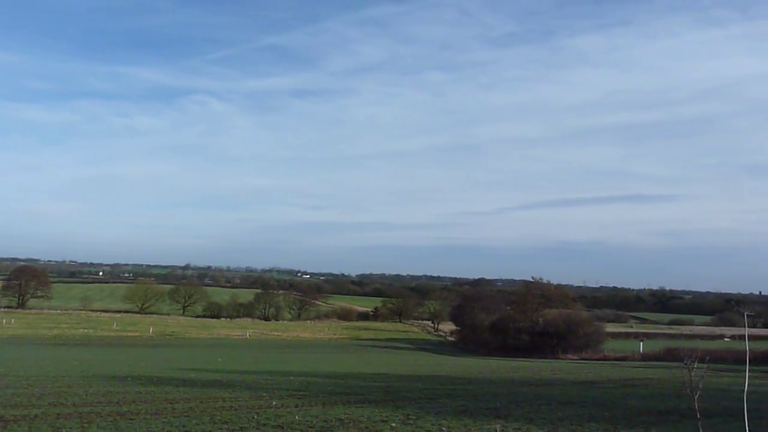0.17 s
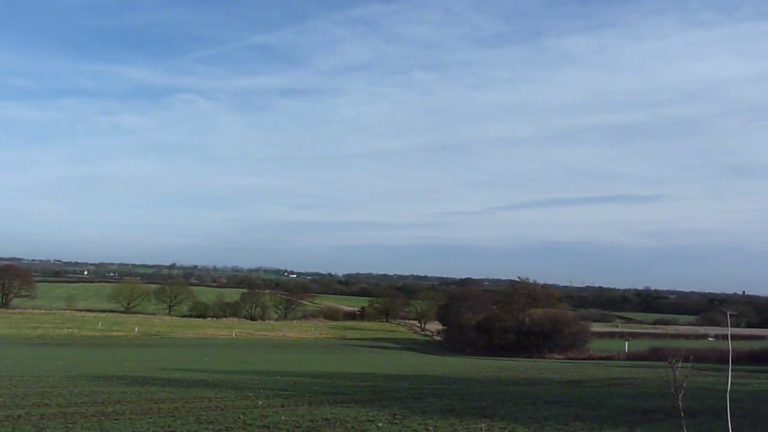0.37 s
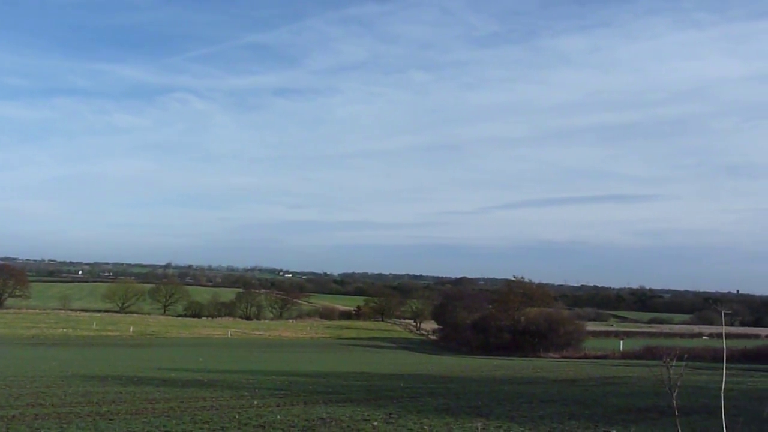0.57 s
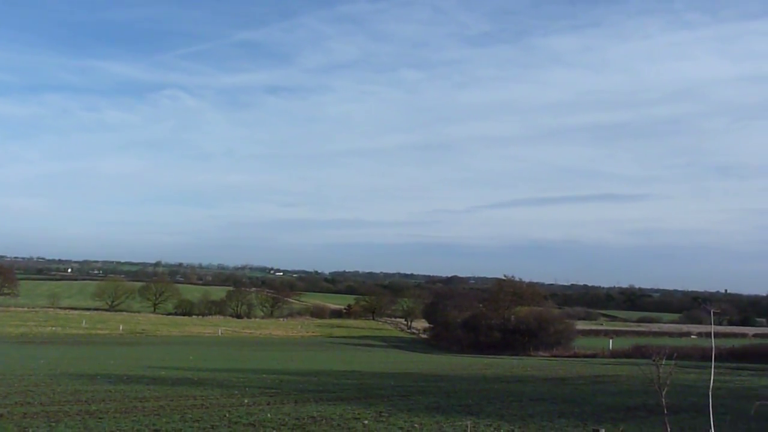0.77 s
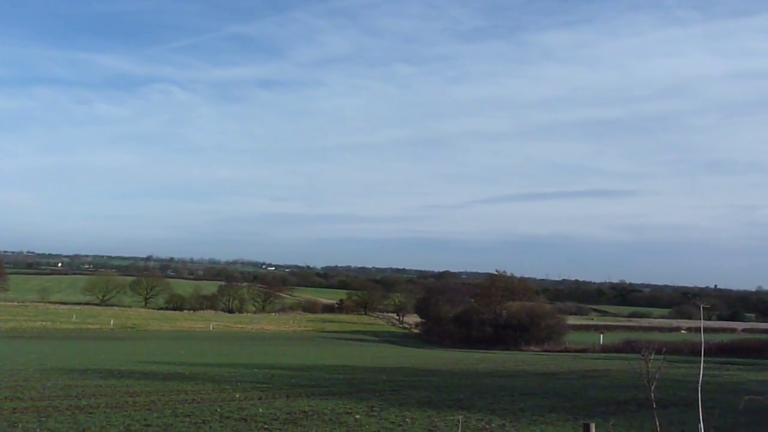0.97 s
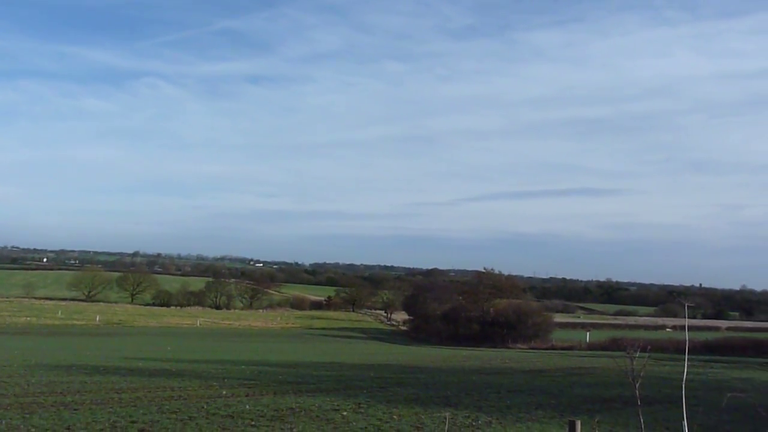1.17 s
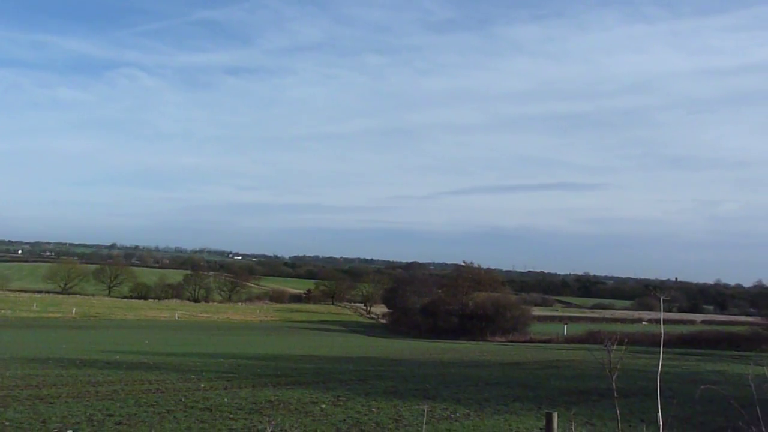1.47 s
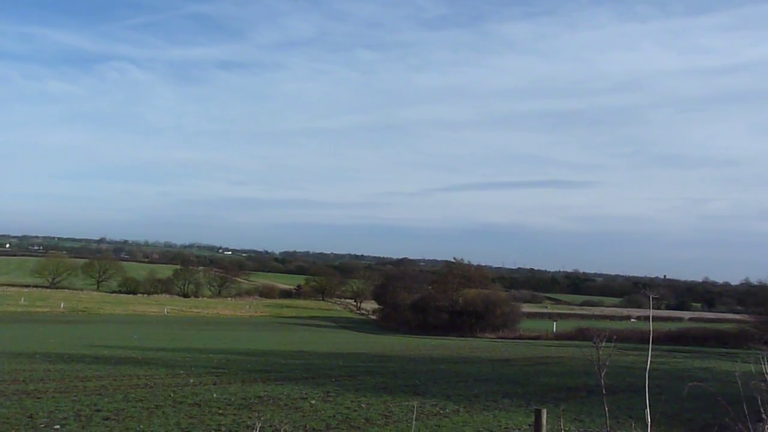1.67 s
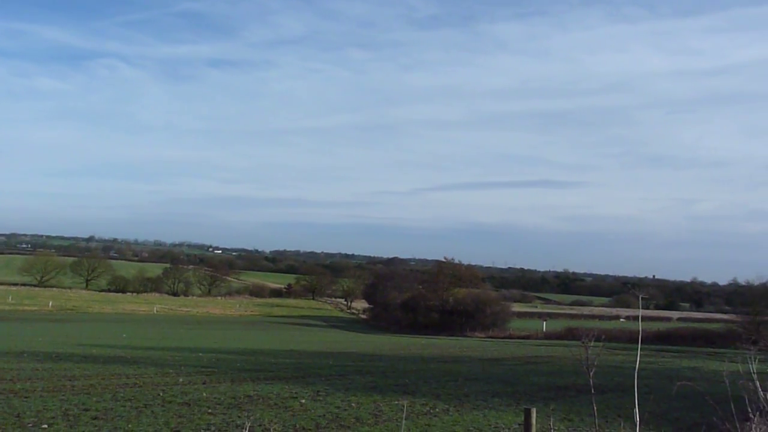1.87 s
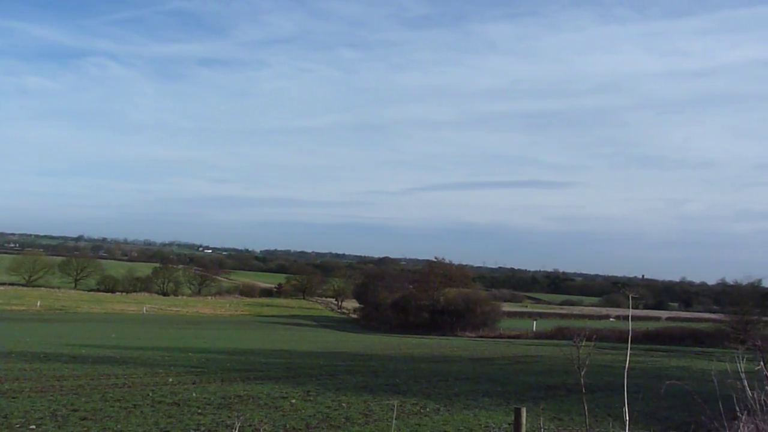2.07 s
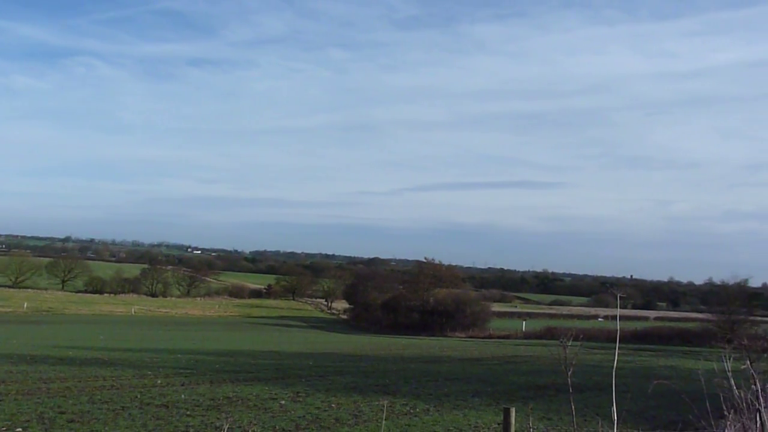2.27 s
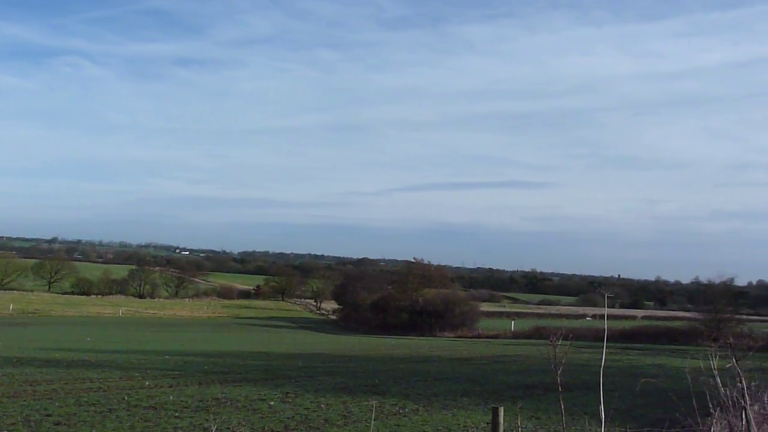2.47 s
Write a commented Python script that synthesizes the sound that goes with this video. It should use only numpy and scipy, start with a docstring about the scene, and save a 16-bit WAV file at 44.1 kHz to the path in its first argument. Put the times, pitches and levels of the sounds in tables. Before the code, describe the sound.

Birdsong across open farmland, busy at first then sparse, with low far-road roar and late wind thumps

```python
"""Farmland birds over far traffic

Small birds whistle and slur as bending sines; the ground adds single echoes and hedges a diffuse noise tail. A
nearer bird on the right gives a rising harmonic "chwee" with a scratchy onset, then two trilled rasps. Shaped
noise and an engine tone make far traffic; low noise makes two light gusts on the microphone, the last with soft
thumps of short sines. The camera adds hiss, a thin whine, a brief rustle, narrow notches and a treble limit."""
import sys
import numpy as np
from scipy import signal
from scipy.fft import rfft, irfft, next_fast_len
from scipy.io import wavfile
from scipy.ndimage import map_coordinates

SR = 44100
rng = np.random.default_rng(int(sys.argv[2]) if len(sys.argv) > 2 else 0)


def materialize(psi):
    """Save the field psi as 16-bit PCM at rate SR to the path in sys.argv[1].

    A 1-D psi becomes a single channel; in a 2-D psi each row is a channel.
    """
    bounded = np.clip(np.atleast_2d(psi).T, -1, 1)
    quanta = np.round(bounded * 32767).astype(np.int16)
    wavfile.write(sys.argv[1], SR, quanta)


N = 115101  # length in samples

# Colours are relative: each noise is scaled to rms 1 before its level. Positive pan is left.
# low traffic rumble colour: pitch_hz, level_db
RUMBLE_COLOUR = [(10, -20), (25, -11), (40, -6), (52, -.5), (95, -1), (160, -8.5), (260, -20), (450, -34),
                 (2000, -60)]
# traffic roar colour: pitch_hz, level_db
ROAR_COLOUR = [(120, -14), (210, -4.5), (290, 1), (370, -1), (530, -6), (720, -4), (950, -7), (1300, -16),
               (2000, -25), (3000, -46), (9000, -54)]
# likeness of left and right in the traffic: pitch_hz, correlation (1 = identical)
TRAFFIC_LIKENESS = [(200, .985), (500, 1), (1000, .92), (2000, .75)]
# tyre noise colour: pitch_hz, level_db
TYRE_COLOUR = [(300, -42), (750, 1), (1050, 1.5), (1400, -10), (2500, -32.5), (6000, -54.5)]
# swell of tyre noise: time_s, level_db
TYRE_SWELL = [(0, -73), (.55, -66), (1.1, -57.5), (1.5, -70), (2.6, -82)]
# far engine drone: time_s, level_db
DRONE_SWELL = [(0, -53), (.7, -52), (1.2, -50.5), (1.6, -57), (2.1, -54), (2.6, -50)]
RUMBLE_DB, ROAR_DB = -48.5, -48.5
DRONE_HZ, DRONE_WANDER_HZ = 81.5, 6
TRAFFIC_LEAD_S, TRAFFIC_PAN_DB = .00006, 0.6

# camera hiss colour: pitch_hz, level_db
HISS_COLOUR = [(100, -6), (1800, 5.5), (3600, 3), (6200, 4), (7200, 2), (7700, -4), (8500, -18.5),
               (9000, -24)]
# camera whine partials: pitch_hz, level_db
WHINE_PARTIALS = [(500, -65), (1000, -75.5)]
HISS_DB, HISS_PAN_DB = -64.5, -1

# whistled notes: start_s, length_s, start_hz, middle_hz, end_hz, level_db, pan_db
WHISTLED_NOTES = [ (-.015, 0.072, 7900, 7550, 7200, -65, -11), (0.044, 0.024, 7300, 6970, 6400, -66, -12),
                  (0.047, 0.097, 3400, 3190, 3230, -59, 1), (0.136, 0.055, 7540, 7350, 6750, -66, -9),
                  (.178, .025, 7000, 6600, 5700, -59, -11.5), (0.201, 0.0526, 3934, 3882, 3870, -55, 2),
                  (.246, .052, 3994, 3995, 3890, -63, 0), (0.248, .028, 7060, 6820, 6830, -64.5, -8),
                  (0.29, .022, 3950, 3780, 3150, -61, 5), (.33, .027, 6100, 5750, 5430, -55.5, -10.5),
                  (.353, .018, 5450, 5130, 4750, -51.5, -12), (.303, .026, 3350, 2780, 2680, -66, 2),
                  (.335, .11, 2700, 2840, 2790, -71, 2), (.444, .034, 6300, 6600, 6540, -65, -13),
                  (0.479, 0.017, 6130, 6120, 6260, -62, 7), (0.543, .012, 5300, 5050, 4800, -53, -10),
                  (0.736, 0.03, 5720, 5620, 5500, -63.5, -16), (0.76, 0.023, 5490, 5220, 4800, -62, -16),
                  (0.787, 0.048, 4320, 4130, 3730, -70, 6), (1.609, 0.06, 5180, 5340, 5250, -69.5, 9),
                  (1.805, 0.039, 4350, 3980, 3530, -68, 6), (2.125, 0.034, 5320, 5200, 5020, -72, 4.5),
                  (2.371, 0.042, 5400, 5200, 4950, -68, 12)]
NOTE_ATTACK_S, NOTE_RELEASE_S = 0.012, .007
WAVER_FRACTION, FLUTTER_DB = .006, 2.2  # random pitch and level movement
LEAD_S_PER_DB = .000005  # the louder side also hears a bird first

# single echoes off the ground: delay_s, level_db
GROUND_ECHOES = [(.02, -16), (.036, -19)]
HEDGE_DB, HEDGE_T60_S, HEDGE_BUILDUP_S = -8.5, .5, .008

# Near-bird levels are set ahead of its flutter, which also lowers them on average.
# rising call: time_s, pitch_hz, level_db (ahead of the throat)
RISING_CALL = [(0.497, 2100, -65), (.506, 2370, -55), (.514, 2650, -56), (0.5215, 3000, -48),
               (.524, 3220, -49), (0.533, 3270, -49), (.537, 3500, -55), (.546, 4170, -46),
               (0.554, 4450, -60), (.562, 4370, -49), (0.57, 4320, -45), (.58, 4380, -62),
               (.665, 4390, -71)]
# throat resonance, as gain on each harmonic: pitch_hz, gain_db
THROAT_GAIN = [(2300, -8), (3200, -5.5), (4300, 2), (5200, 0), (6400, .5), (7300, -8), (8200, -36),
               (12000, -52)]
# quick upward sweeps of a second voice at the onset: start_s, length_s, start_hz, end_hz, level_db
ONSET_SWEEPS = [(0.503, 0.011, 3200, 3800, -56), (0.509, 0.012, 3100, 3600, -54)]
# short rasps: start_s, length_s, centre_hz, level_db
SHORT_RASPS = [(0.495, .027, 6400, -53), (.518, .025, 6200, -55), (.54, .05, 6000, -66),
               (0.707, 0.028, 4750, -55.5), (1.28, 0.036, 4790, -62)]
CALL_ROUGH_FRACTION, SWEEP_ROUGH_FRACTION = .008, .03  # random pitch jitter
CALL_EDGE_S, RASP_RELEASE_S = .003, .008
RASP_JITTER_HZ, TRILL_HZ, TRILL_SWING_HZ = 340, 112, 550
CALL_FLUTTER_DB, RIGHT_BIRD_PAN_DB = 2.2, -14.5

# wind buffeting colour: pitch_hz, level_db
WIND_COLOUR = [(10, -20), (35, -5), (85, 1.5), (150, -5), (300, -14), (480, -22), (2000, -68.5)]
# the gusts: time_s, level_db
WIND_GUSTS = [(0, -68), (1.2, -69), (1.4, -51), (1.7, -62), (2.1, -69), (2.32, -56), (2.41, -42),
              (2.5, -42), (2.61, -49)]

# hand rustle colour: pitch_hz, level_db
RUSTLE_COLOUR = [(1000, -20), (2600, 1), (4000, 4), (6200, 4), (9000, -26)]
RUSTLE_S, RUSTLE_WIDTH_S, RUSTLE_DB, RUSTLE_PAN_DB = 2.207, .009, -57, -2.5

# soft low thumps of wind on the microphone in the last gust: start_s, length_s, pitch_hz, level_db, pan_db
WIND_THUMPS = [(2.414, .032, 88, -37.5, 1.5), (2.477, .02, 95, -36, -6), (2.489, .026, 300, -40.5, 0)]

# narrow camera notches: centre_hz, half_width_hz
CAMERA_NOTCHES = [(2600, 304), (4600, 294), (5430, 140), (7880, 150)]
TOP_HZ = 8750


def amp(db):
    """Decibels to linear gain."""
    return 10 ** (np.asarray(db) / 20)


def unit(x):
    """Scale to rms 1."""
    return x / np.sqrt(np.mean(x ** 2) + 1e-20)


def clock():
    """Time of every sample in seconds."""
    return np.arange(N) / SR


def along(points, hz):
    """Read (pitch_hz, value) points on a log pitch axis."""
    point_hz, value = np.transpose(points)
    return np.interp(np.log(hz + 1), np.log(point_hz + 1), value)


def curves(rows):
    """One value per sample for each column after the time."""
    time, *columns = np.transpose(rows)
    return [np.interp(clock(), time, column) for column in columns]


def wobble(rate):
    """A smooth random curve with rate knots a second."""
    knots = rng.standard_normal(int(N * rate / SR) + 4)
    return map_coordinates(knots, [clock() * rate])


def filtered(x, response):
    """Shape x by a response of frequency."""
    m = next_fast_len(N + SR // 2)
    spectrum = rfft(x, m) * response(np.fft.rfftfreq(m, 1 / SR))
    return irfft(spectrum, m)[..., :N]


def panned(x, pan_db):
    """Make the left louder than the right by pan_db, keeping the mean power gain at 1."""
    gains = amp(np.array([[pan_db], [-pan_db]]) / 2)
    return x * unit(gains)


def ahead(x, lead_s):
    """The left side arrives lead_s earlier than the right."""
    sides = np.array([[1], [-1]])
    return filtered(x, lambda f: np.exp(1j * np.pi * f * lead_s * sides))


def rush(colour, alike=((100, 0), (1000, 0))):
    """Stereo noise of rms 1; mid and side shares set its left-right likeness."""
    def mid_side_gains(hz):
        turn = np.arccos(np.clip(along(alike, hz), -1, 1)) / 2
        return amp(along(colour, hz)) * [np.cos(turn), np.sin(turn)]
    mid, side = filtered(rng.standard_normal((2, N)), mid_side_gains)
    return unit(np.array([mid + side, mid - side]))


def tone(hz):
    """A sine of rms 1 that follows a pitch curve."""
    return np.sqrt(2) * np.sin(2 * np.pi * np.cumsum(hz) / SR)


def gate(start, length, attack, release):
    """A short sound's samples, its own time and its smooth attack, hold and release."""
    on = np.arange(max(int(start * SR), 0), min(int((start + length) * SR), N))
    t = on / SR - start
    rise = np.sin(np.pi / 2 * np.clip(t / attack, 0, 1))
    fall = np.sin(np.pi / 2 * np.clip((length - t) / release, 0, 1))
    return on, t, rise * fall


def traffic():
    """A far road a little to the left: rumble and roar, a swell of tyre noise and a low engine drone."""
    rumble = amp(RUMBLE_DB + 1.1 * wobble(12)) * rush(RUMBLE_COLOUR, TRAFFIC_LIKENESS)
    roar = amp(ROAR_DB + .3 * wobble(5.58)) * rush(ROAR_COLOUR, TRAFFIC_LIKENESS)
    tyres = amp(curves(TYRE_SWELL)[0]) * rush(TYRE_COLOUR, TRAFFIC_LIKENESS)
    drone_level = amp(curves(DRONE_SWELL)[0] + 2.5 * wobble(12))
    drone = drone_level * tone(DRONE_HZ + DRONE_WANDER_HZ * wobble(18))
    return panned(ahead(rumble + roar + tyres + drone, TRAFFIC_LEAD_S), TRAFFIC_PAN_DB)


def camera_hiss():
    """Steady coloured noise, independent on each side."""
    return panned(amp(HISS_DB) * rush(HISS_COLOUR), HISS_PAN_DB)


def camera_whine():
    """Thin whine of steady sines in the centre."""
    return sum(amp(db) * tone(np.full(N, hz)) for hz, db in WHINE_PARTIALS)


def whistles():
    """Pure notes, each bending through three pitches; the nearer ear hears it louder and earlier."""
    out = np.zeros((2, N))
    waver = 1 + WAVER_FRACTION * wobble(250)
    flutter = amp(FLUTTER_DB * wobble(130))
    for start, length, first, middle, last, db, pan_db in WHISTLED_NOTES:
        on, t, envelope = gate(start, length, NOTE_ATTACK_S, NOTE_RELEASE_S)
        u = t / length
        bend = (middle - (first + last) / 2) * (1 - (2 * u - 1) ** 2)
        hz = first + (last - first) * u + bend
        lead_cycles = hz * LEAD_S_PER_DB * np.array([[pan_db], [-pan_db]]) / 2
        cycles = np.cumsum(hz * waver[on]) / SR + lead_cycles
        note = np.sqrt(2) * np.sin(2 * np.pi * cycles)
        out[:, on] += panned(amp(db) * flutter[on] * envelope * note, pan_db)
    return out


def hedges(x):
    """Single echoes off the ground and a diffuse decaying tail from hedges and trees."""
    t = np.arange(SR // 2) / SR
    decay = amp(-60 * t / HEDGE_T60_S)
    buildup = 1 - np.exp(-t / HEDGE_BUILDUP_S)
    tail = rng.standard_normal((2, len(t))) * decay * buildup
    tail = tail / np.linalg.norm(tail[0])
    single = filtered(x, lambda f: sum(amp(db) * np.exp(-2j * np.pi * f * s) for s, db in GROUND_ECHOES))
    return single + amp(HEDGE_DB) * signal.fftconvolve(x, tail, axes=1)[:, :N]


def throat(hz):
    """A voice of three harmonics, each weighted by the throat's resonance."""
    return sum(amp(along(THROAT_GAIN, k * hz)) * tone(k * hz) for k in (1, 2, 3))


def rising_call(jitter):
    """The "chwee": a rough harmonic voice climbs, with quick sweeps of a second voice at its onset."""
    out = np.zeros(N)
    hz, db = curves(RISING_CALL)
    start, end = RISING_CALL[0][0], RISING_CALL[-1][0]
    on, t, envelope = gate(start, end - start, CALL_EDGE_S, CALL_EDGE_S)
    out[on] += amp(db[on]) * envelope * throat(hz[on] * (1 + CALL_ROUGH_FRACTION * jitter[on]))
    for start, length, first, last, db in ONSET_SWEEPS:
        on, t, envelope = gate(start, length, CALL_EDGE_S, CALL_EDGE_S)
        sweep_hz = first + (last - first) * t / length
        out[on] += amp(db) * envelope * throat(sweep_hz * (1 + SWEEP_ROUGH_FRACTION * jitter[on]))
    return out


def rasps(jitter):
    """Dry rasps: fast trill and random jitter smear a sine's pitch."""
    out = np.zeros(N)
    for start, length, centre, db in SHORT_RASPS:
        on, t, envelope = gate(start, length, CALL_EDGE_S, RASP_RELEASE_S)
        trill = -TRILL_SWING_HZ * np.cos(2 * np.pi * TRILL_HZ * t)
        out[on] += amp(db) * envelope * tone(centre + trill + RASP_JITTER_HZ * jitter[on])
    return out


def near_bird():
    """Call and rasps share pitch jitter and level flutter; the right ear hears them louder and earlier."""
    jitter = wobble(1200)
    voice = rising_call(jitter) + rasps(jitter)
    voice = voice * amp(CALL_FLUTTER_DB * (wobble(400) - 1.0))  # flutters around a lowered level
    return panned(ahead(voice, LEAD_S_PER_DB * RIGHT_BIRD_PAN_DB), RIGHT_BIRD_PAN_DB)


def wind():
    """Two light gusts buffet each microphone port separately, as independent low noise."""
    return amp(curves(WIND_GUSTS)[0]) * rush(WIND_COLOUR)


def hand_rustle():
    """A brief rustle of the hand: coloured noise swells and fades exponentially."""
    swell = np.exp(-abs(clock() - RUSTLE_S) / (2 * RUSTLE_WIDTH_S))
    return amp(RUSTLE_DB) * swell * panned(rush(RUSTLE_COLOUR), RUSTLE_PAN_DB)


def wind_thumps():
    """Wind buffets the microphone in the last gust: each low sine swells and dies within a few cycles."""
    out = np.zeros((2, N))
    for start, length, hz, db, pan_db in WIND_THUMPS:
        on, t, envelope = gate(start, length, length / 2, length / 2)
        out[:, on] += panned(amp(db) * envelope * tone(np.full(len(t), hz)), pan_db)
    return out


def scene():
    """Birds and their echoes over traffic, wind and camera sounds."""
    birds = whistles() + near_bird()
    camera = camera_hiss() + camera_whine() + hand_rustle()
    return traffic() + birds + hedges(birds) + wind() + wind_thumps() + camera


def record(dry):
    """The camera cuts narrow notches to silence at their centres and keeps nothing above its band limit."""
    def response(f):
        notches = [1 - 1 / (1 + 1j * (f - hz) / half_width) for hz, half_width in CAMERA_NOTCHES]
        return np.prod(notches, axis=0) * (f < TOP_HZ)
    return filtered(dry, response)


dry = scene()
out = record(dry)
materialize(out)
```